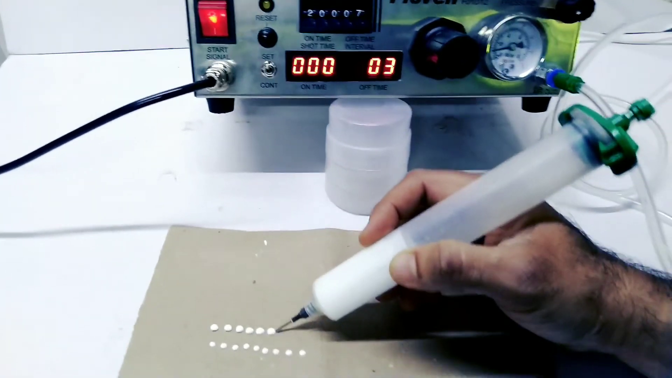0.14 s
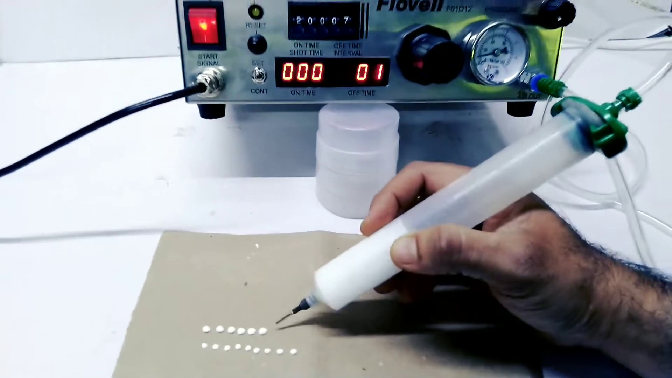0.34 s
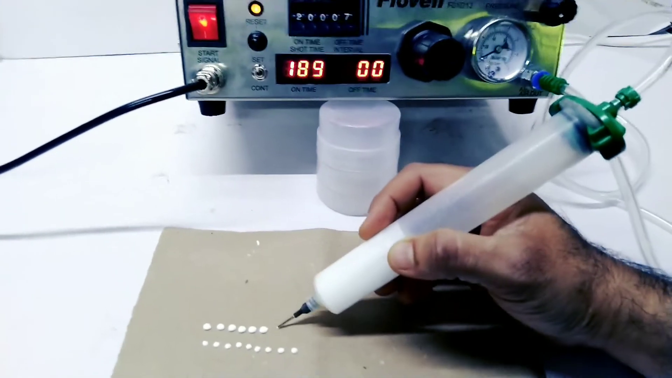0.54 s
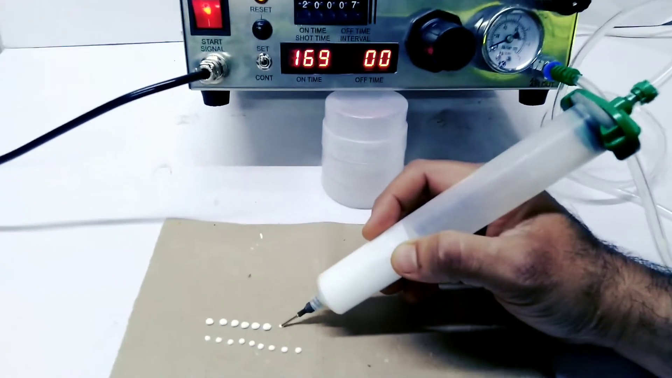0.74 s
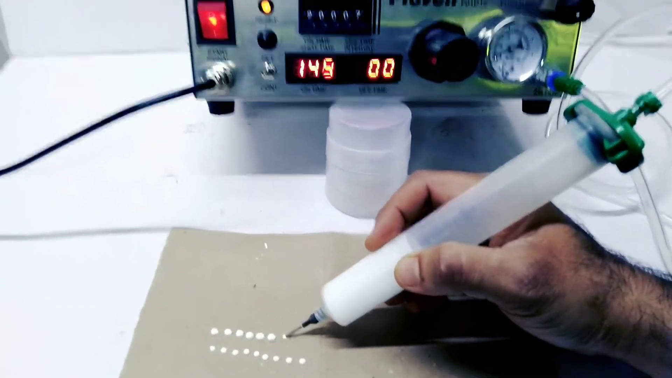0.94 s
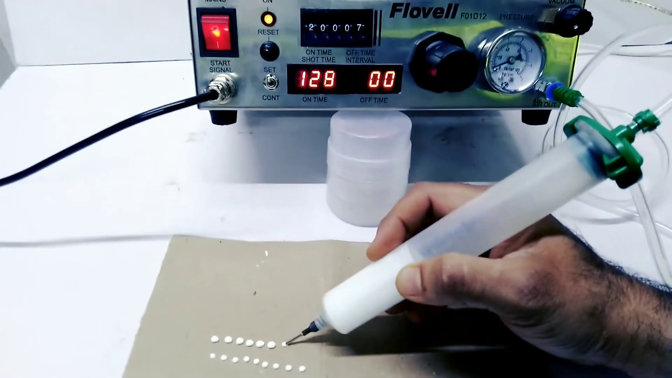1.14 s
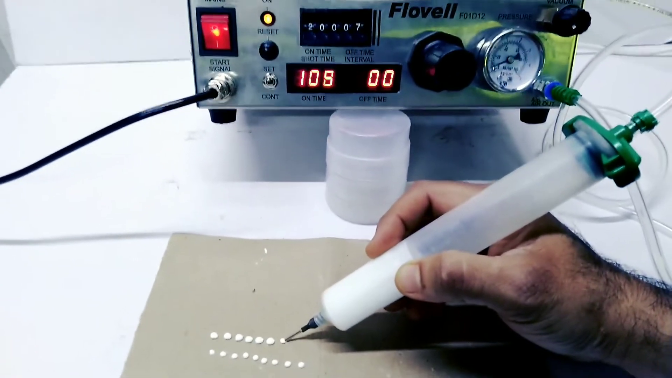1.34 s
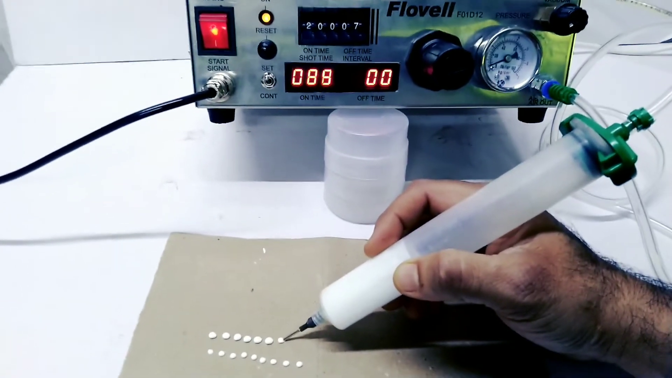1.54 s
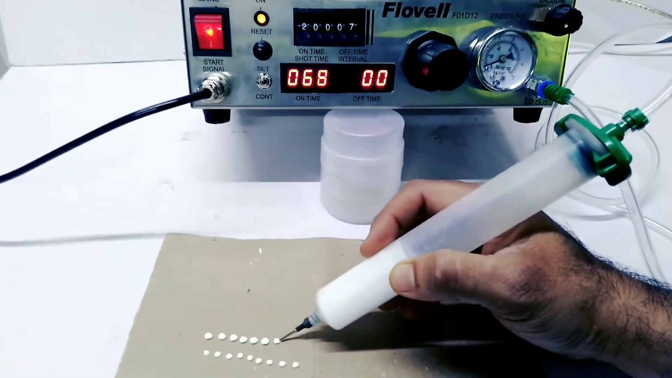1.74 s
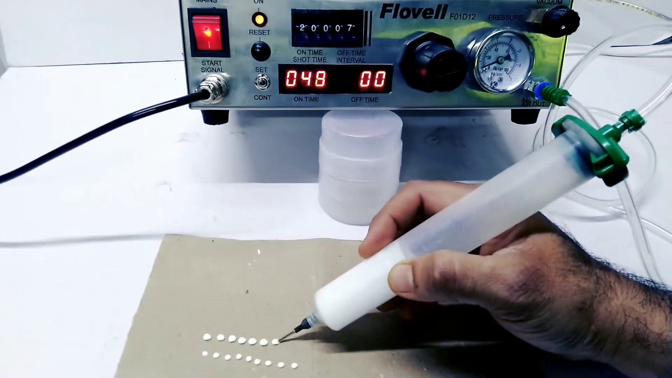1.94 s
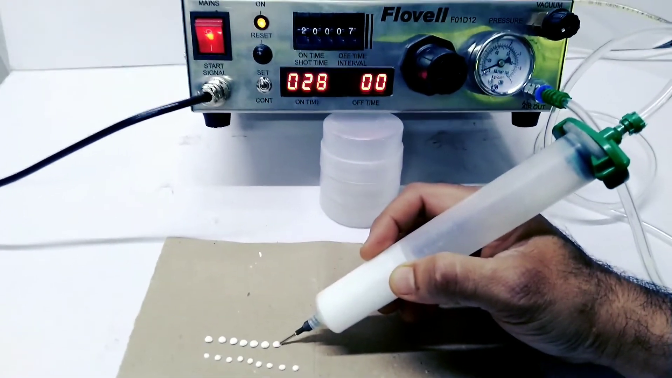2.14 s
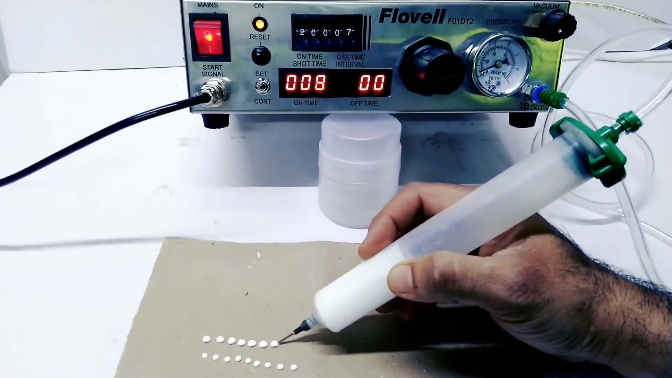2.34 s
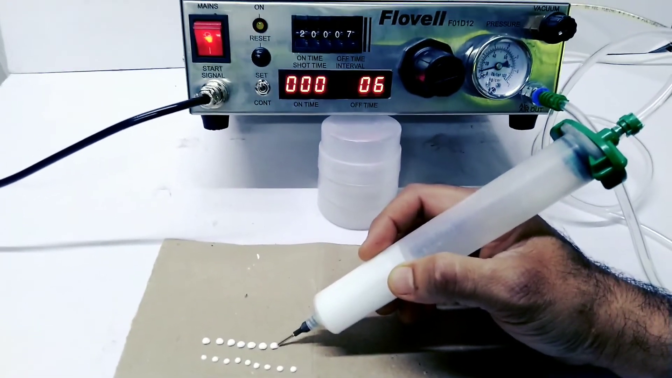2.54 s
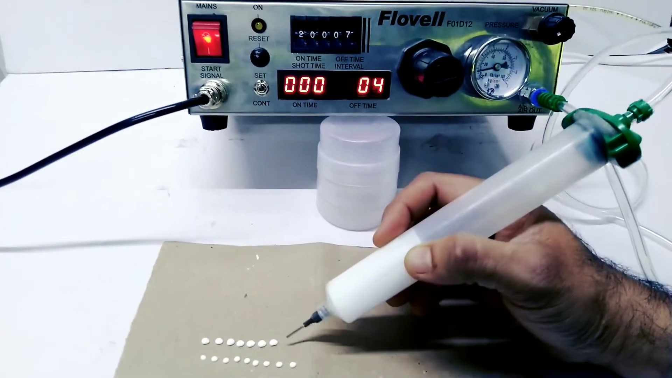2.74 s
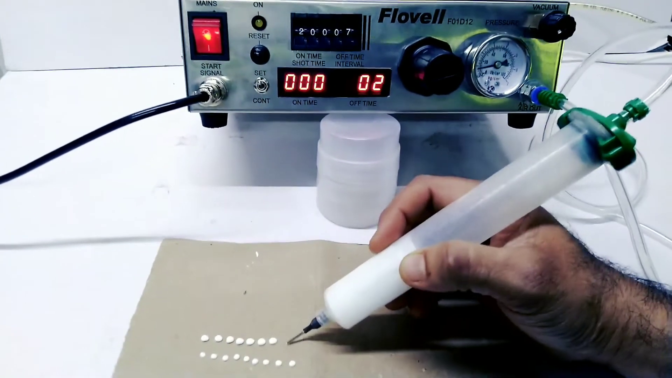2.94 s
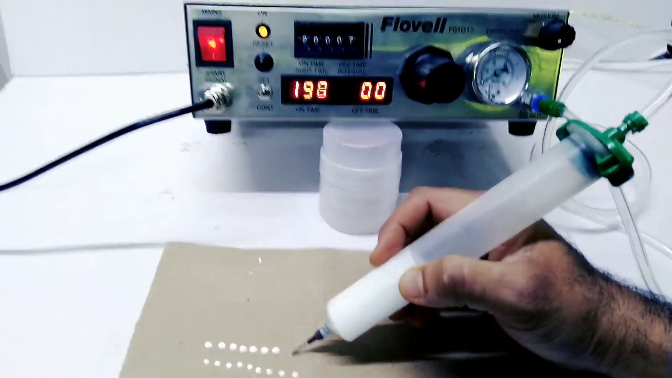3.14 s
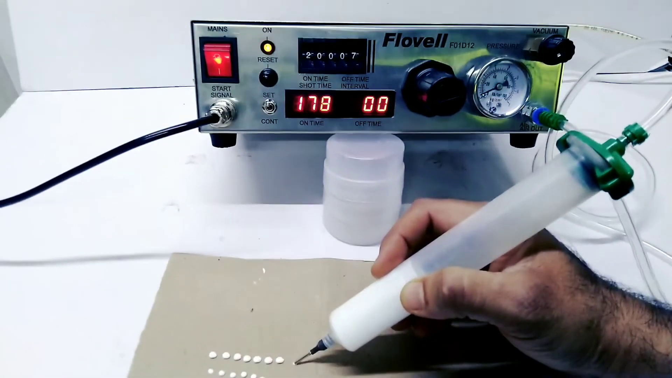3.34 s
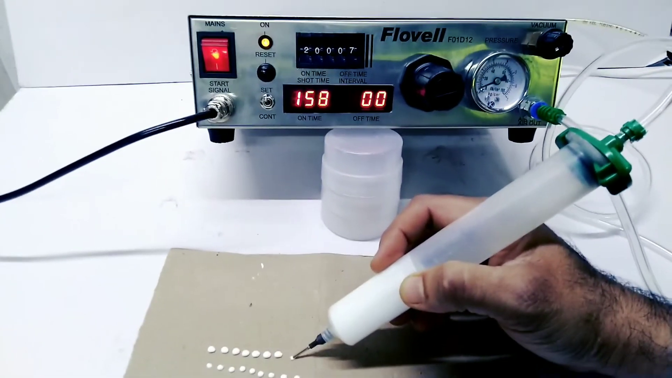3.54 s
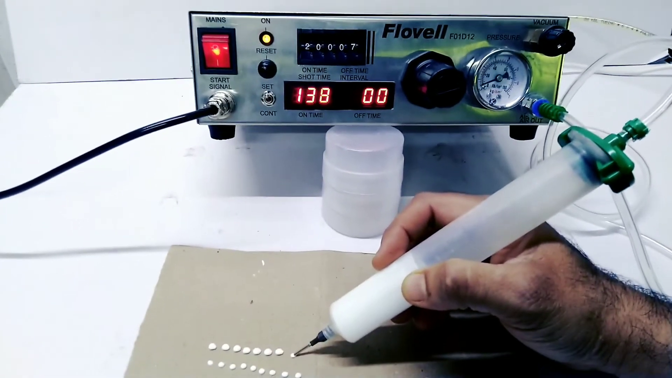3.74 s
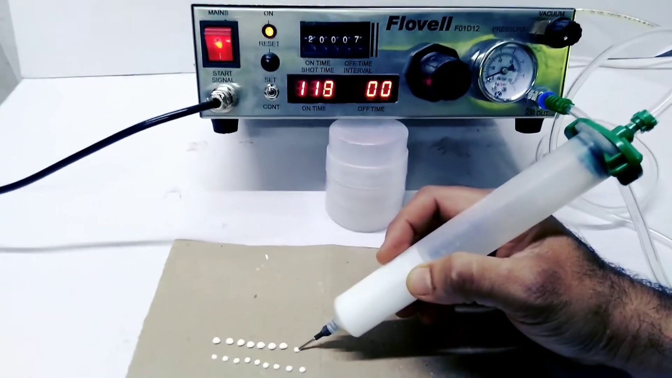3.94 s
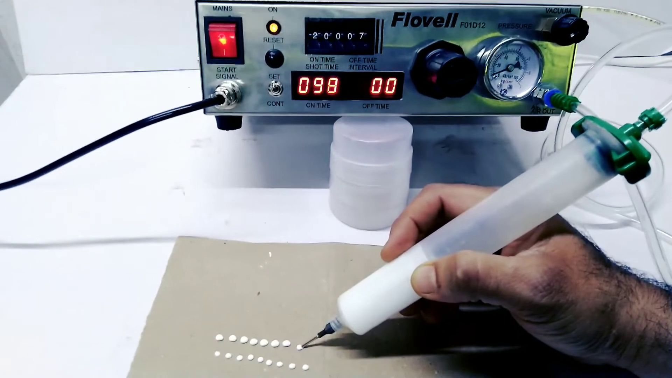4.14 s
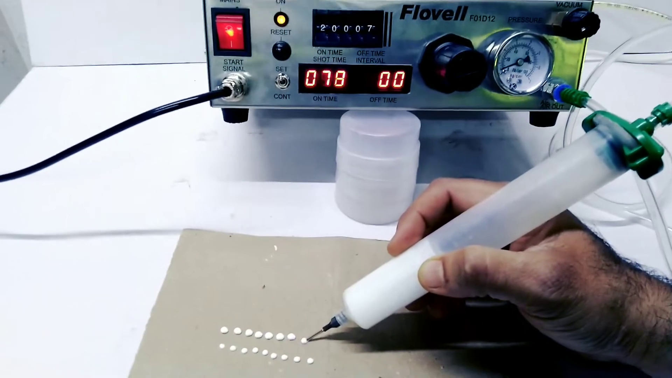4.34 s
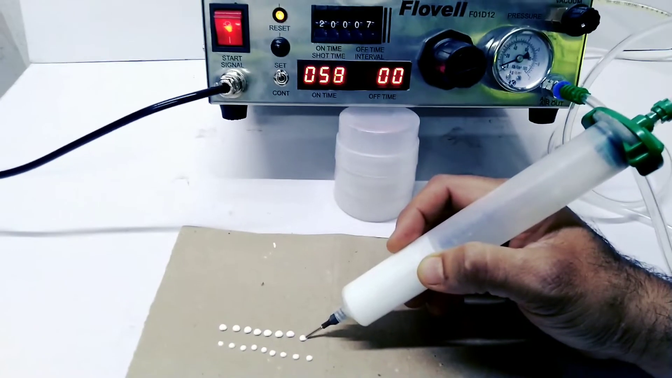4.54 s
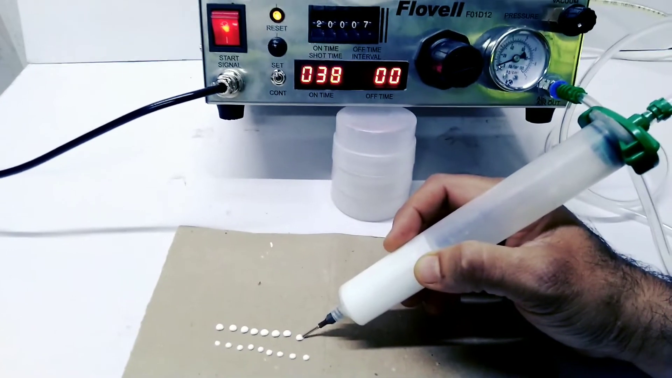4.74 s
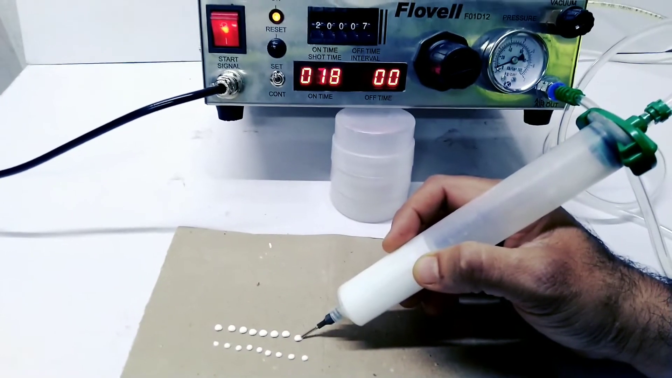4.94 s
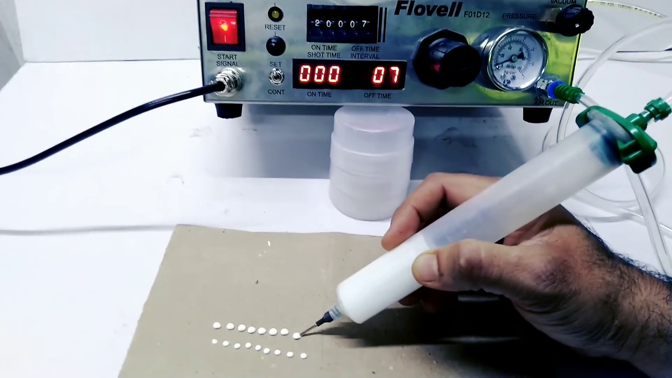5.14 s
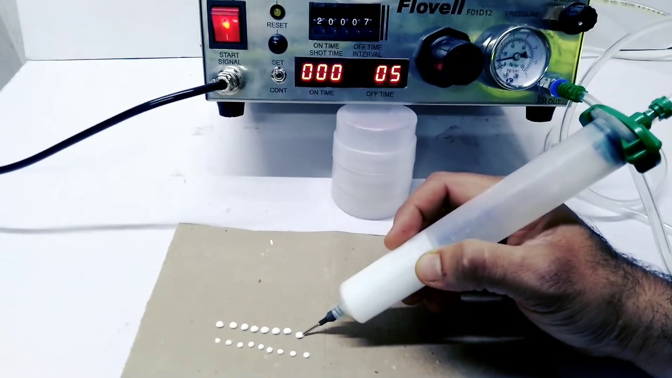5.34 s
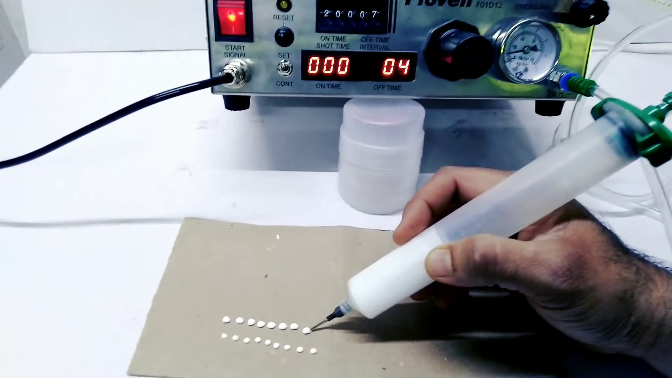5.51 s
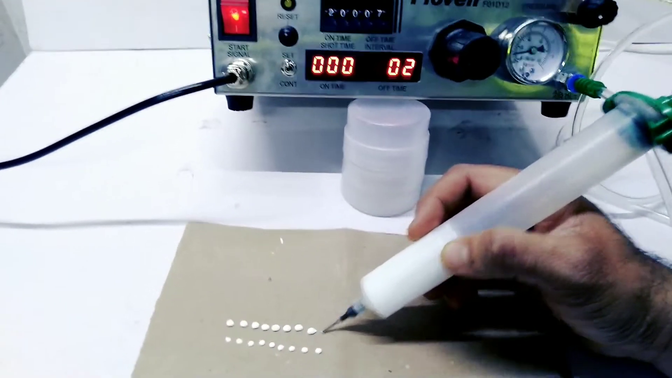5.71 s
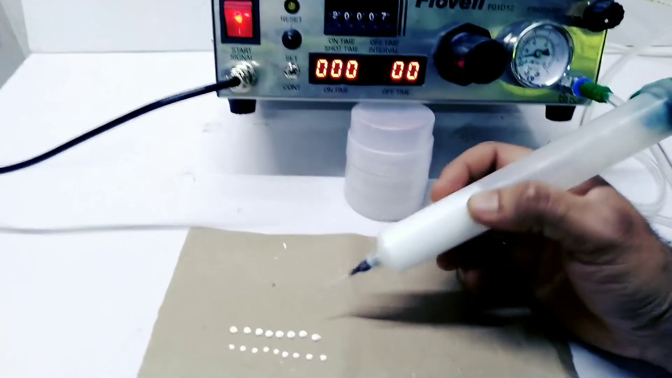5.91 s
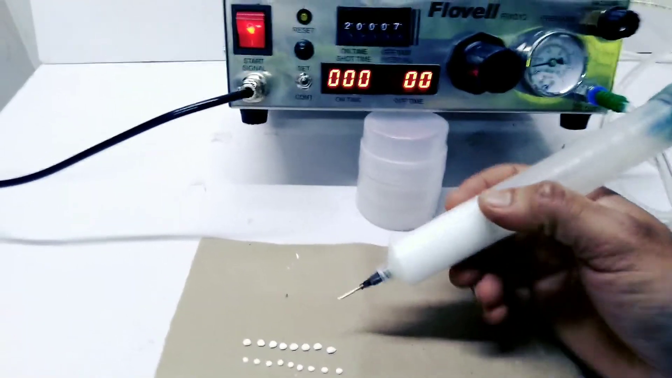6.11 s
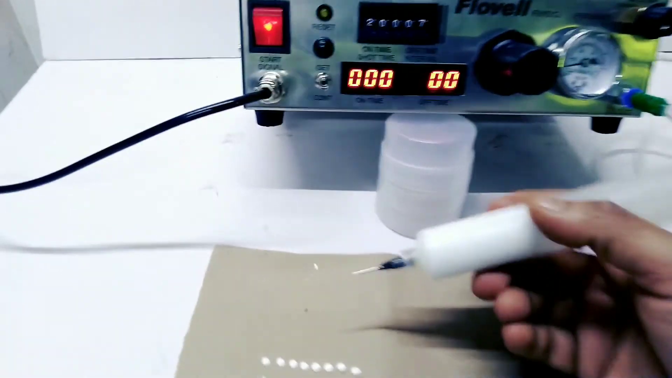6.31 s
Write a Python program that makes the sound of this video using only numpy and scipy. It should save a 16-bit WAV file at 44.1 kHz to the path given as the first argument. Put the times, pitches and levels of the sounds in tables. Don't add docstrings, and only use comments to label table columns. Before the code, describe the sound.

Two sharp metallic valve clacks, each followed by a steady air hiss and a venting thump, then a switch knock and faint rustle

```python
import sys
import numpy as np
from scipy import signal
from scipy.fft import rfft, irfft
from scipy.io import wavfile
from scipy.ndimage import uniform_filter1d, map_coordinates

SR = 44100
rng = np.random.default_rng(int(sys.argv[2]) if len(sys.argv) > 2 else 0)


def amplitude_ratio(level_db):
    exponent = np.asarray(level_db, float) / 20
    return 10 ** exponent


def store_wav(level_fs):
    pcm = np.round(np.clip(np.atleast_2d(level_fs), -1, 1) * 32767)
    wavfile.write(sys.argv[1], SR, pcm.T.astype(np.int16))


N = 280917


def rms_one(x):
    return x / np.sqrt(np.mean(x ** 2) + 1e-20)


def at_hz(points, hz):
    table_hz, value = np.array(points).T[:2]
    return np.interp(np.log(np.maximum(hz, 1)), np.log(table_hz), value)


def colour(x, spectrum):
    size = 8192
    points = [(1, -120)] + list(spectrum) + [(SR / 2, -120)]
    db = at_hz(points, np.fft.rfftfreq(size, 1 / SR))
    cepstrum = irfft(np.log(amplitude_ratio(db)))
    cepstrum[1:size // 2] *= 2
    cepstrum[size // 2 + 1:] = 0
    pulse = irfft(np.exp(rfft(cepstrum)))[:size // 2]
    pulse = pulse / np.sqrt(np.sum(pulse ** 2))
    return signal.fftconvolve(np.atleast_2d(x), pulse[None], axes=1)[:, :N]


def drift(rate):
    knots = rng.standard_normal(2000)
    return map_coordinates(knots, [np.arange(N) / SR * rate + 5], order=3)


def burst(start, rise, hold, t60):
    t = np.arange(N) / SR - start
    return np.clip(t / rise, 0, 1) * amplitude_ratio(-60 * np.clip(t - rise - hold, 0, 3) / t60)


def clicks_at(times, db):
    out = np.zeros(N)
    out[np.round(np.array(times) * SR).astype(int)] = amplitude_ratio(db)
    return out


def strike(blows, modes):
    out = 0
    for hz, db, t60 in modes:
        radius, angle = amplitude_ratio(-60 / (t60 * SR)), 2 * np.pi * hz / SR
        gain = amplitude_ratio(db) * np.sin(angle)
        poles = [1, -2 * radius * np.cos(angle), radius * radius]
        out = out + signal.lfilter([0, gain], poles, blows + 1e-18)
    return out


def air_noise(tables, spectrum, fade):
    t, level = np.arange(N) / SR, 0
    for rows in tables:
        s, db = np.transpose(rows)
        fade_in = np.clip((t - s[0] + fade) / fade, 0, 1)
        fade_out = np.clip((s[-1] + 0.0097 - t) / 0.0036, 0, 1)
        level = level + amplitude_ratio(np.interp(t, s, db)) * fade_in * fade_out
    flutter = amplitude_ratio(0.38 * drift(42))
    return colour(level * flutter * rng.standard_normal(N), spectrum)[0]


# (frequency [Hz], correlation [-1 to 1])
LIKENESS = [(100, 0.43), (250, 1), (640, 0.71), (1400, -0.046), (3000, 0.047), (15000, -0.2)]


def pair(size):
    mid, side = rfft(rng.standard_normal((2, size)))
    alike = np.clip(at_hz(LIKENESS, np.fft.rfftfreq(size, 1 / SR)), -1, 1)
    return (np.sqrt(1 + alike) * mid + np.sqrt(1 - alike) * side * [[1], [-1]]) / np.sqrt(2)


# (frequency [Hz], decay by 60 dB [s])
ROOM_T60 = [(200, 0.88), (1000, 0.11), (4000, 0.4), (12000, 0.2)]
DIRECT_DB, BENCH_DB, ROOM_DB = -7.5, -0.5, -7
LEFT_LAG_S = .00011


def room(x):
    size = SR // 2
    t, hz = np.arange(size) / SR, np.fft.rfftfreq(size, 1 / SR)
    spectra, tail = pair(size), 0
    edges = 100 * 2. ** np.arange(8)
    for low, high in zip(np.r_[0, edges], np.r_[edges, SR]):
        t60 = at_hz(ROOM_T60, max(low, 1) * np.sqrt(2))
        fall = amplitude_ratio(-60 * t / t60) * np.clip((t - .001) / 0.0063, 0, 1)
        band = irfft(spectra * ((hz >= low) & (hz < high)))
        tail = tail + band * fall / np.sqrt(np.sum(fall ** 2))
    quick = amplitude_ratio(-60 * t / 0.011) * (t > 8 / SR)
    bench = irfft(pair(size)) * quick / np.sqrt(np.sum(quick ** 2))
    bench = signal.sosfilt(signal.butter(2, 3000, "high", fs=SR, output="sos"), bench)
    delay = np.array([[LEFT_LAG_S], [0]]) + 8 / SR
    direct = irfft(np.exp(-2j * np.pi * hz * delay))
    echo = amplitude_ratio(DIRECT_DB) * direct + amplitude_ratio(BENCH_DB) * bench + amplitude_ratio(ROOM_DB) * tail
    return signal.fftconvolve(x[:, None], echo[None], axes=2)[:, :, 8:N + 8]


# (frequency [Hz], level [dB per Hz])
SELF_NOISE = [(1760, -32), (3000, -5.5), (4280, -7), (5470, -12.5), (6700, -14), (8200, -20), (9820, -13),
              (13600, -13), (15300, -30)]


def self_noise():
    return amplitude_ratio(-66.5 + 0.61 * drift(10.0)) * colour(rng.standard_normal((2, N)), SELF_NOISE)


# (frequency [Hz], level [dB per Hz])
FAN = [(88, -18.5), (150, -2.5), (198, -5.5), (257, 0), (306, -11), (370, -2), (475, -6), (603, -8),
       (692, -6.5), (815, -9.5), (846, -9), (1600, -13.5), (3000, -24), (3900, -90.5), (6600, -120)]
# (frequency [Hz], width [Hz], lift [dB])
DUCT = [(230.2, 16, 4.5), (395, 4.2, 10.5), (511, 60, 4.5), (837, 68, 5.5), (1274, 52.6, 5),
        (1565, 25, 7.5)]


def fan():
    hz = np.fft.rfftfreq(N + 1, 1 / SR)
    db = at_hz([(40, -71)] + list(FAN) + [(17000, -110)], hz)
    for centre, width, lift_db in DUCT:
        db = db + lift_db / (1 + ((hz - centre) / width * 2) ** 2)
    hum = irfft(pair(N + 1) * amplitude_ratio(db), N + 1)[:, :N]
    return amplitude_ratio(-44.5 + 0.33 * drift(8.1)) * rms_one(hum)


# (time [s], level [dB], left minus right [dB])
DRAUGHT = [(0.0, -37.5, 21), (0.05, -44.5, 5.5), (1.33, -46, 0.5), (1.7, -37, -12.5), (1.76, -39, 0),
           (2.2, -43, -13), (2.23, -41.5, 4), (2.59, -42, -17), (2.96, -44, 6), (3.05, -49, -16.5),
           (3.32, -44, 6.5), (3.99, -52.5, -5), (4.22, -44.5, 2.5), (4.98, -41.5, -3), (5.66, -51, 4),
           (5.91, -41.5, -17), (6.21, -52, 13), (6.37, -37.5, -11)]
# (frequency [Hz], level [dB per Hz])
RUMBLE = [(20, -40), (33, -16), (45, -6), (62, -1.5), (90, -5), (120, -14), (200, -34.5)]
# (frequency [Hz], level [dB per Hz])
BUFFET = [(60, -39.5), (110, 7.5), (150, -10), (220, -10.5), (350, -29)]
# (time [s], peak level [dB], pitch [Hz], port [0 left, 1 right])
GUSTS = [(0.408, -28, 104, 0), (0.506, -22, 122, 1), (0.807, -30.5, 126, 0), (1.361, -25, 88, 0),
         (1.497, -27, 127, 1), (1.506, -32, 105, 0), (1.611, -23.5, 128, 1), (1.657, -15.5, 146, 1),
         (1.741, -19.5, 114, 0), (1.823, -21, 150, 0), (1.958, -19.5, 112, 0), (2.043, -21, 94, 1),
         (2.106, -31, 104, 0), (2.144, -18.5, 115, 1), (2.469, -22, 126, 1), (2.606, -24.5, 93, 1),
         (2.649, -36, 109, 1), (2.876, -26, 128, 0), (3.084, -28.5, 143.5, 1), (3.924, -24, 117, 1),
         (4.001, -18.5, 152, 1), (4.082, -28, 119, 1), (4.156, -24, 102, 1), (4.467, -25, 122, 1),
         (4.545, -28, 92, 0), (4.949, -25.5, 96, 1), (5.816, -27.5, 114, 1), (5.914, -29, 116, 1),
         (6.068, -29.5, 97.5, 1), (6.271, -30.5, 134, 1)]
RUMBLE_DB = 5
LULL_DB, LULLS_PER_S = 1, 7.0
SWELL_DB, SWELL_S = -10, 0.035
SMALL_EDDY_DB, SMALL_EDDY_SPREAD_DB = 2.5, 5
EDDY_HZ, EDDY_SPREAD_HZ = 112, 4


def weak_eddies(steady):
    when, port = rng.random((2, 30))
    size, pitch = rng.standard_normal((2, 30))
    at, port = (when * (N - 1)).astype(int), port.round().astype(int)
    peak_db = steady[port, at] + SMALL_EDDY_DB + SMALL_EDDY_SPREAD_DB * size
    return np.c_[at / SR, peak_db, EDDY_HZ + EDDY_SPREAD_HZ * pitch, port]


def draught():
    t = np.arange(N) / SR
    s, level_db, lean_db = np.transpose(DRAUGHT)
    lean = np.interp(t, s, lean_db) / 2 * np.array([[1], [-1]])
    steady = np.interp(t, s, level_db) + lean
    low = colour(rng.standard_normal((2, N)), RUMBLE)
    sharp = colour(rng.standard_normal((2, N)), BUFFET)
    low = low / np.sqrt(uniform_filter1d(low ** 2, size=3000) + 0.091)
    lulls = LULL_DB * np.array([drift(LULLS_PER_S), drift(LULLS_PER_S)])
    power = amplitude_ratio(2 * (steady + RUMBLE_DB + lulls))
    for s, peak_db, hz, port in GUSTS:
        power[round(port)] += amplitude_ratio(2 * (peak_db + SWELL_DB)) * np.exp(-((t - s) / SWELL_S) ** 2)
    db = 10 * np.log10(power)
    out = amplitude_ratio(db) * low + amplitude_ratio(2.4 * (db + 29.5) - 44.0) * sharp
    eddies = np.r_[np.array(GUSTS), weak_eddies(steady)]
    for (s, peak_db, hz, port), turn in zip(eddies, rng.random(len(eddies))):
        near = slice(max(round((s - .04) * SR), 0), round((s + .04) * SR))
        cycles = (t[near] - s) * hz * 0.97
        swell = amplitude_ratio(peak_db + 1.5) * np.exp(-(cycles / 0.44) ** 2)
        out[round(port), near] += swell * np.cos(2 * np.pi * (cycles - 0.083 * cycles ** 2 + turn))
    return out


# (time [s], level [dB])
RUSTLE = [
    (5.9, -76),
    (5.916, -64),
    (5.964, -90),
    (6.002, -64),
    (6.238, -61),
    (6.298, -64.5),
    (6.35, -85),
]
# (frequency [Hz], level [dB per Hz])
CLOTH = [(2650, -10), (4500, -2), (4980, -8), (6110, -11), (8080, -13), (8860, -14), (9560, -4.5),
         (10700, -1), (15200, -13)]


def rustle():
    return np.array([air_noise([RUSTLE], CLOTH, fade=.05), air_noise([RUSTLE], CLOTH, fade=.05)])


# (time [s], knock level [dB], rattle level [dB])
TOGGLE = [
    (5.5222, -24, -41.5),
    (5.5300, -31, -40.5),
    (5.5420, -19, -29),
    (5.5490, -49.5, -41),
    (5.5570, -43, -34),
]
# (frequency [Hz], level [dB per Hz])
SNAP = [(710, -22), (1200, -6), (1640, -6), (1980, -4), (3050, -11.5), (3280, -11.5), (5090, -6),
        (6110, -19), (6650, -8), (7410, -31), (9170, -12), (13300, -10.5), (15500, -27)]
# (frequency [Hz], level [dB], decay by 60 dB [s])
PANEL = [(744, -6, 0.047), (846, 3.5, 0.033), (917, -2, 0.044), (940, -1.5, 0.04)]


def toggle():
    s, knock_db, rattle_db = np.transpose(TOGGLE)
    rattle = sum(amplitude_ratio(d) * burst(t, 0.00035, 0.001, 0.047) for t, d in zip(s, rattle_db))
    knock = strike(clicks_at(s + 0.00146, knock_db - 32.5), [(865, 0, 0.007)])
    return strike(knock, PANEL) + colour(rattle * rng.standard_normal(N), SNAP)[0]


# (time [s], thump level [dB], vent level [dB], vent hold [s])
SHUTS = [
    (2.5135, -15.5, -27.5, .045),
    (5.2410, -18, -27, .045),
]
# (frequency [Hz], level [dB per Hz])
VENT = [(530, -32), (900, 2.5), (1200, -1), (1300, -8), (1580, -1.5), (2450, -4.5), (2630, -4.5),
        (4050, -1), (4620, -6), (6680, -9.5), (7530, -13), (9010, -9), (9910, 1), (14000, -1),
        (15600, -3.5)]
# (frequency [Hz], level [dB], decay by 60 dB [s])
BARREL = [(215, -58, 0.13), (351, -45, 0.35), (390.4, -31, 0.17), (393, -35.5, 0.056), (470.5, -36, 0.3),
          (585, -42, 0.3), (760, -70, .05)]


def valve_shuts():
    t, thump, puff = np.arange(N) / SR, 0, 0
    for s, thump_db, vent_db, hold in SHUTS:
        phase = (t - s - .0013) / .0009
        thump = thump + amplitude_ratio(thump_db) * (phase ** 2 - 1) * np.exp(-phase ** 2 / 2)
        first_rush = burst(s + 0.00039, 0.0003, 0.0029, 0.16)
        emptying = 0.45 * burst(s + 0.00047, 0.00079, hold, 0.19)
        puff = puff + amplitude_ratio(vent_db) * (first_rush + emptying)
    air = puff * amplitude_ratio(0.49 * drift(180)) * rng.standard_normal(N)
    blow = clicks_at([s + 0.0115 for s, *rest in SHUTS], 2.5) + 1.3 * air
    return thump + colour(air, VENT)[0] + strike(blow, BARREL)


# (time [s], level [dB])
FLOW = [
    [(0.62, -47), (0.922, -45.5), (1.566, -46), (1.724, -47.5), (2.5, -45.5)],
    [(3.35, -46.5), (4.732, -46), (5.23, -47)],
]
# (frequency [Hz], level [dB per Hz])
JET = [(1470, -41.5), (2500, -13.5), (3600, -9.5), (4140, -7), (4480, -9.5), (4950, -6.5), (5520, -15),
       (6400, -7.5), (7470, -9), (8330, -18), (9890, -4.5), (12500, -3), (13600, -5), (15000, -4.5),
       (16000, -18.5)]


def line_hiss():
    return air_noise(FLOW, JET, fade=0.11)


# (frequency [Hz], left minus right [dB])
JET_SIDE = [(3000, -3), (8000, 3), (9500, 7.5), (11500, -3), (13000, 3), (15000, 16)]


def beam(air):
    lean_db = at_hz(JET_SIDE, np.fft.rfftfreq(N + 1, 1 / SR)) / 2 * np.array([[1], [-1]])
    return irfft(rfft(air, N + 1) * amplitude_ratio(lean_db), N + 1)[:, :N]


# (time [s], peak level [dB])
OPENS = [
    (0.4792, -5),
    (0.4806, -13),
    (0.487, -14),
    (0.4907, -19),
    (3.2063, -5.5),
    (3.2098, -10.5),
    (3.2185, -17),
]
# (frequency [Hz], level [dB per Hz])
PLUNGER = [(120, -6.5), (200, -45), (418, -18), (502, -1.5), (753, -19), (1190, -3), (1310, -7.5),
           (1990, -14), (3000, -18.5), (4500, -18), (6500, -19), (8200, -30), (10500, -6), (12400, -9),
           (15400, -15.5), (16300, -36)]
# (frequency [Hz], level [dB], decay by 60 dB [s])
CASE = [(347.5, -30, 0.053), (384, -19.5, .05), (523.4, -27.5, 0.039), (895, -21.5, 0.029),
        (1200, -57.5, .03), (1246, -57, 0.028), (2036, -24.5, 0.092), (2307, -16.5, 0.014),
        (10730, -26.5, 0.045), (14700, -42.5, .012)]


def valve_opens():
    s, db = np.transpose(OPENS)
    crack = sum(amplitude_ratio(d - 2.0) * burst(t, 0.00023, 0.00039, 0.01) for t, d in OPENS)
    creep = sum(amplitude_ratio(-73.5) * burst(t - .0035, 0.0026, 0.000405, .004) for t in s[[0, 4]])
    blow = (crack + creep) * rng.standard_normal(N) + clicks_at(s, db + 8)
    return colour(blow, PLUNGER)[0] + strike(clicks_at(s, db + 4.5), CASE)


def scene():
    background = self_noise() + fan() + draught()
    dispenser = valve_opens() + valve_shuts() + toggle()
    blows, air = room(np.array([dispenser, line_hiss()]))
    return background + rustle() + blows + beam(air)


# (frequency [Hz], level against the 9-15 kHz level [dB])
MASK = [(2500, -20), (3000, -11), (3300, -2), (4000, -4.5), (4600, -3), (5500, -9.5), (6400, -9),
        (7300, -1.5), (8000, -9), (8700, -6), (11200, -8), (12600, -1.5), (14000, -9), (15500, -12)]
MASK_CHANCE_DB = 3.8


def drop_masked(x):
    hop, start = 1024, 1024 - 142
    count = (N + start) // hop + 1
    padded = np.pad(x, ((0, 0), (start, (count + 1) * hop - start - N)))
    window = np.sin(np.pi * (np.arange(2 * hop) + .5) / (2 * hop))
    frames = np.arange(count)[:, None] * hop + np.arange(2 * hop)
    spectra = rfft(padded[:, frames] * window)
    edges = np.arange(120, 729, 16)
    width = np.diff(edges)
    power = np.add.reduceat(np.sum(abs(spectra) ** 2, axis=0), edges, axis=1)[:, :-1] / width
    treble = power[:, -19:].mean(axis=1)
    chance = uniform_filter1d(rng.standard_normal(power.shape), size=2, axis=0) * np.sqrt(2)
    mask_db = at_hz(MASK, edges[:-1] * SR / 2 / hop) + MASK_CHANCE_DB * chance
    bar = treble[:, None] * amplitude_ratio(2 * mask_db)
    bar *= np.clip(treble / np.median(treble), 0, 1)[:, None] ** .3
    attack = treble > 4 * np.r_[treble[:2], treble[:-2]]
    bar[attack] = 0
    kept = spectra[..., edges[0]:edges[-1]]
    kept *= np.repeat(power > bar, width, axis=1)
    kept *= abs(kept) ** 2 > .8 * np.repeat(bar, width, axis=1)
    halves = (irfft(spectra) * window).reshape(2, count, 2, hop)
    joined = (halves[:, 1:, 0] + halves[:, :-1, 1]).reshape(2, -1)
    return np.c_[x[:, :hop - start], joined, x[:, hop - start + joined.shape[1]:]][:, :N]


def roll_off(x):
    return signal.sosfilt(signal.butter(12, 16820, fs=SR, output="sos"), x)


def record(dry):
    rounded = .8 * np.tanh(dry / .8)
    low_pass = signal.ellip(10, .5, 60, 15560, fs=SR, output="sos")
    mix = drop_masked(signal.sosfilt(low_pass, rounded))
    return roll_off(mix)


dry = scene()
out = record(dry)
store_wav(out)
```